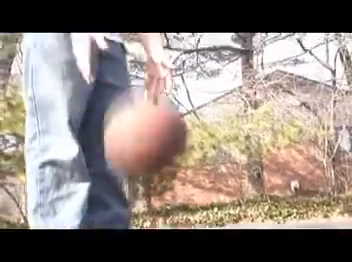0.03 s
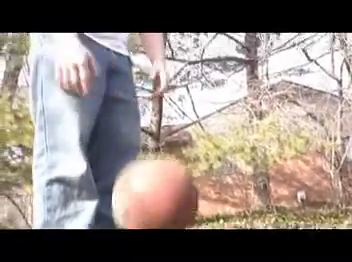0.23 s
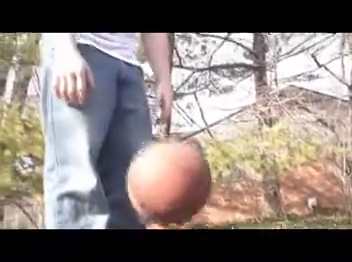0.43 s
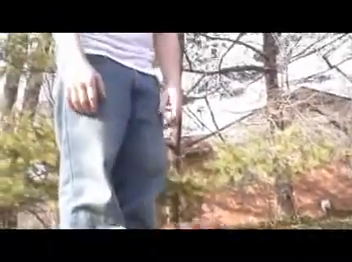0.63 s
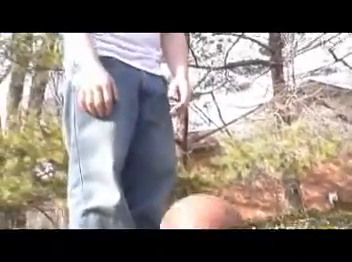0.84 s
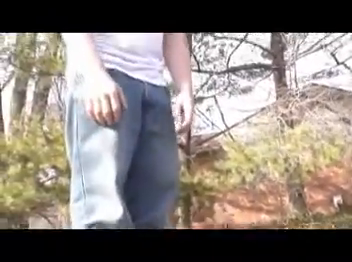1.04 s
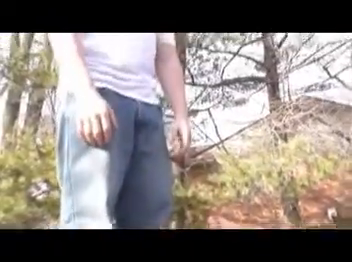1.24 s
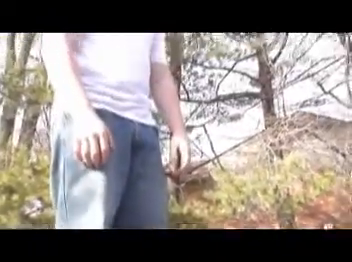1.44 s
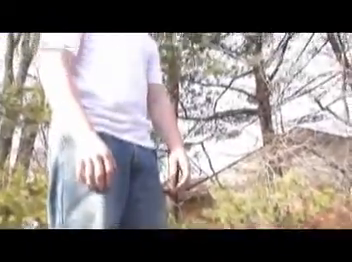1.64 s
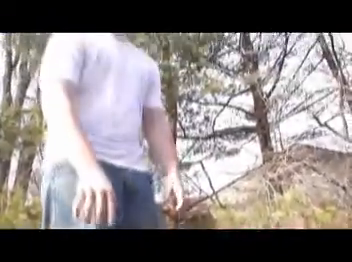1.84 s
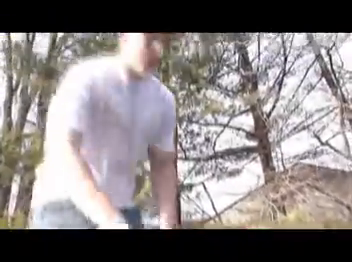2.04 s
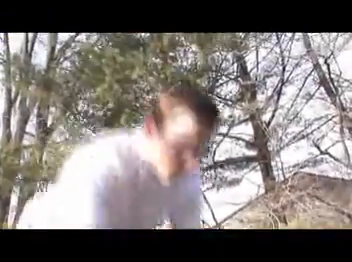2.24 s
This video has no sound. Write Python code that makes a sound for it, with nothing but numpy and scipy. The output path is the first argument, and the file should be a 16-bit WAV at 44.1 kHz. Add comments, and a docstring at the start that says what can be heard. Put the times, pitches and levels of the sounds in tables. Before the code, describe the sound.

A basketball bounces close by on pavement outdoors, each landing a rubbery slap and deep thump with a faint ping and thin echo. The loudest come at 0.2 and 0.7 seconds, then six more from 1.1 to 1.9 seconds, ever quicker and softer. Light ticks, faint clothes rustle and a distant engine hum sit underneath. Around 2 seconds, a brief puff of wind buffets the microphone.

```python
"""A paved drive among trees and houses, a stereo microphone close to a dropped basketball.
The ball bounces ever lower and faster: each bounce is a rubber slap, a deep thump of the shell and a
faint ping of the air inside. A nearby surface answers, and the yard adds a thin tail.
An engine hums far off, clothes rustle, hands and grit tick, and near the end a puff of wind
buffets the microphone."""
import sys
import numpy as np
from scipy import signal
from scipy.fft import rfft, irfft
from scipy.io import wavfile

SR = 44100
rng = np.random.default_rng(int(sys.argv[2]) if len(sys.argv) > 2 else 0)


def output_pcm(signal):
    """Save a mono or channel-first signal as 16-bit PCM at the path in sys.argv[1].

    Samples are clipped to [-1, 1] before scaling.
    """
    pcm = np.clip(np.atleast_2d(signal).T, -1, 1) * 32767
    wavfile.write(sys.argv[1], SR, np.round(pcm).astype(np.int16))


N = 105840


def amp(db):
    """Decibels to amplitude."""
    return 10 ** (np.asarray(db) / 20)


def unit(x):
    """Scales to an rms of one."""
    return x / np.sqrt(np.mean(x ** 2) + 1e-20)


def read(points, hz, column=1):
    """Reads one column of a table on a log-frequency axis."""
    table = np.transpose(points)
    return np.interp(np.log(hz + 1), np.log(table[0]), table[column])


def level(curve):
    """Gain over time from a dB curve."""
    return amp(np.interp(np.arange(N) / SR, *np.transpose(curve)))


def add(mix, start_s, sound):
    """Mixes a sound in at its start time."""
    part = mix[..., max(round(start_s * SR), 0):][..., :sound.shape[-1]]
    part += sound[..., :part.shape[-1]]


def colour(x, spectrum, tilt_db=0, tilt_from_hz=1500, size=4096):
    """Minimum-phase filter from a spectrum, with the treble tilted by tilt_db per octave."""
    hz = abs(np.fft.fftfreq(size, 1 / SR))
    octaves = np.log2(np.maximum(hz / tilt_from_hz, 1))
    log_gain = np.log(amp(read(spectrum, hz) + tilt_db * octaves))
    taps = np.fft.ifft(np.exp(np.conj(signal.hilbert(log_gain)))).real
    return signal.fftconvolve(x, taps[:size // 2])[:len(x)]


def fade(t, t60):
    """Exponential decay, 60 dB down at t60."""
    return np.exp(-np.log(1000) * t / t60)


def rise(t, rise_s):
    """Soft onset from zero towards one."""
    return 1 - np.exp(-t / rise_s)


def ring(t, hz, db, t60):
    """One dying mode."""
    return amp(db) * fade(t, t60) * np.sin(2 * np.pi * hz * t)


def burst(t, t60):
    """A dying puff of noise with an energy of one."""
    puff = rng.standard_normal(len(t)) * fade(t, t60)
    return puff / np.linalg.norm(puff)


def noise(spectrum, likeness):
    """Steady stereo noise with an rms of one, a given spectrum and left-right likeness (0 to 1)."""
    left, other = rfft(rng.standard_normal((2, N)))
    right = likeness * left + np.sqrt(1 - likeness ** 2) * other
    gain = amp(read(spectrum, np.fft.rfftfreq(N, 1 / SR)))
    return unit(irfft(np.array([left, right]) * gain, N))


# Open air all around the drive: freq_hz, gain_db
AIR_COLOUR = [(12, -40.5), (20, 4.5), (49, -15), (185, -10), (236, -16.5), (451, -18), (592, -20.5),
              (1850, -28.5), (2630, -37), (2850, -34.5), (4280, -38.5), (12000, -42), (13000, -50)]
# How alike air and rustle are on the microphone's two sides: freq_hz, likeness
STEREO_LIKENESS = [(30, 0.7), (150, 1), (600, 0), (2000, 0.11), (10000, 0.03)]
# Clothes, loudest at the start and the end: time_s, level_db
RUSTLE_LEVEL = [(0, -63), (.12, -111), (.3, -84), (1.5, -77), (1.9, -74), (2.15, -68), (2.4, -67)]
# Spectrum of the cloth: freq_hz, gain_db
RUSTLE_COLOUR = [(200, 9), (1200, 6.5), (3000, 2), (6000, -4), (12000, -6)]


def air_and_clothes(air_db=-63):
    """A steady outdoor hush with the rustle of clothes coming and going over it."""
    likeness = read(STEREO_LIKENESS, np.fft.rfftfreq(N, 1 / SR))
    air = amp(air_db) * noise(AIR_COLOUR, likeness)
    return air + level(RUSTLE_LEVEL) * noise(RUSTLE_COLOUR, likeness)


# Tones of an engine a long way off: pitch_hz, level_db
ENGINE_TONES = [(87, -66), (134, -70), (177.6, -65), (265, -76), (355, -84.5), (446.8, -79)]
# Their shared swell and fade: time_s, gain_db
ENGINE_SWELL = [(0, -2), (.9, 3.5), (1.5, -2), (2.4, -2.5)]


def far_engine(waver=0.013):
    """A distant engine hums, each tone wavering in pitch on its own."""
    t, hum = np.arange(N) / SR, np.zeros(N)
    for hz, db in ENGINE_TONES:
        drift = sum(np.sin(2 * np.pi * (rate * t + rng.random())) for rate in np.geomspace(.5, 7, 12))
        pitch_hz = hz * (1 + waver * unit(drift))
        hum += amp(db) * unit(np.sin(2 * np.pi * np.cumsum(pitch_hz) / SR))
    return level(ENGINE_SWELL) * hum


# Wind right on the microphone, peaking near two seconds: time_s, level_db
WIND_LEVEL = [(0, -67.5), (.5, -68.5), (1.75, -65), (1.87, -54), (1.945, -53), (1.98, -37.5), (2.02, -39.5),
              (2.065, -39.5), (2.09, -49), (2.2, -56.5), (2.4, -58.5)]
# Spectrum of its rumble: freq_hz, gain_db
WIND_COLOUR = [(15, -10.5), (32, 11.5), (58, -11), (95, 2.5), (190, -11.5), (300, -17.5), (500, -30),
               (1000, -49), (4000, -83)]
# Its two strongest buffets: start_s, level_db, pitch_hz, t60_s
WIND_BUFFETS = [(1.983, -24.5, 162, 0.054), (2.047, -23, 94, 0.059)]


def wind():
    """Low turbulence at the microphone with two soft buffets."""
    t = np.arange(SR // 4) / SR
    rumble = level(WIND_LEVEL) * noise(WIND_COLOUR, likeness=0.71)
    for start_s, db, hz, t60 in WIND_BUFFETS:
        add(rumble, start_s, rise(t, rise_s=.012) * ring(t, hz, db, t60))
    return rumble


# Hands, clothes and grit: start_s, level_db, tilt_db_per_octave, t60_s
TICKS = [(0.037, -27, -2, 0.1), (.062, -28.5, -0.5, 0.2), (0.502, -31.5, -19, 0.017),
         (0.5832, -26, -22.5, 0.083), (0.6631, -27.5, 0.5, 0.022), (.675, -31.5, -2, 0.0071),
         (0.7776, -40.5, 3, 0.013), (1.9159, -35, 3.5, 0.0041), (1.9927, -26.5, -3, 0.024),
         (2.1078, -35.5, -1.5, 0.019)]
# Spectrum of a tick before its tilt: freq_hz, gain_db
TICK_COLOUR = [(100, -28), (600, -2.5), (2000, -2.5), (4500, -4.5), (8000, -13.5), (13000, -15)]
# A soft hollow knock just after the second bounce: start_s, level_db
KNOCKS = [(0.7779, -47)]
# Modes of that knock: pitch_hz, gain_db, t60_s
KNOCK_MODES = [(392, -12, 0.13), (423, 4, 0.081), (662, -0.5, 0.041), (900, -7, 0.046)]


def ticks_and_knock():
    """Light touches give short puffs of noise and one knock rings briefly, all in the centre."""
    t, touches = np.arange(SR // 4) / SR, np.zeros(N)
    for start_s, db, tilt_db, t60 in TICKS:
        add(touches, start_s, amp(db) * colour(burst(t, t60), TICK_COLOUR, tilt_db))
    for start_s, db in KNOCKS:
        add(touches, start_s, amp(db) * sum(ring(t, *mode) for mode in KNOCK_MODES))
    return touches


# Reverberation of the yard around the drive: freq_hz, gain_db, t60_s
YARD_TAIL = [(90, -53, 0.56), (170, -13, 0.88), (280, -19.5, 0.62), (500, -17.5, 0.34), (990, -22, 0.6),
             (2800, -26, 0.7), (4100, -24, 0.76), (6000, -27, 0.45), (12000, -59, 0.14)]


def yard_tail(x):
    """Trees and houses scatter a thin diffuse tail, different on each side of the microphone."""
    hz, t, bands = signal.stft(rng.standard_normal((2, SR)), SR, nperseg=512)
    t60 = read(YARD_TAIL, hz, column=2)[:, None]
    decay = fade(t, t60) * np.sqrt(2 * np.log(1000) / (t60 * SR))  # equal energy for any t60
    gain = amp(read(YARD_TAIL, hz))[:, None]
    tail = signal.istft(bands * gain * decay, SR)[1]
    return signal.fftconvolve(x[None], tail, axes=1)[:, :N]


# What a surface near the ball sends back: freq_hz, gain_db
ECHO_COLOUR = [(100, -19), (250, -4), (480, 4), (900, -2), (1450, -2.5), (2500, -16.5), (5000, -14),
               (12000, -6.5)]


def near_echo(x, delay_s=.0131, gain_db=-12, scatter_db=-5):
    """One dull reflection from nearby, scattered differently from each spot where the ball lands."""
    t, echo = np.arange(SR // 10) / SR, np.zeros(len(x))
    path = amp(scatter_db) * burst(t, t60=0.017)
    path[0] += 1  # the clean reflection
    add(echo, delay_s, amp(gain_db) * signal.fftconvolve(x, colour(path, ECHO_COLOUR)))
    return echo


# Rubber slapping the paving, heard close: freq_hz, gain_db
SLAP_COLOUR = [(40, -7.5), (150, -16), (350, 1), (700, 3.5), (1400, 5), (2300, 0.5), (3600, -5),
               (5000, -13), (8000, -18.5), (13000, -19.5)]
# The scattered slap in the microphone's side signal: freq_hz, gain_db
SLAP_SIDE_COLOUR = [(100, 15), (500, 2), (1400, 1), (3600, -7.5), (5000, -13), (8000, -19), (13000, -28)]
# Modes of the ball's shell: pitch_hz, gain_db, t60_s
SHELL_MODES = [(177, -20.5, 0.031), (236, -1, 0.029), (565, -18, 0.11), (728, -6.5, 0.015),
               (974, -23.5, 0.054)]
# Modes of the air inside the ball: pitch_hz, gain_db, t60_s
CAVITY_MODES = [(969, -3, .35), (1572, -1, .35), (2110, 4, .45), (2638, -5, .5), (2778, -5, 1.0),
                (3160, 2, .4), (3405, -8, .7), (3601, -11, .55), (3671, 1, .38), (4005, -6, .45),
                (4172, -10, .4), (5782, -16, .5)]
THUMP_HZ, THUMP_T60_S, CLAP_T60_S = 104, .082, 0.02
SCATTER_MID_DB, SCATTER_SIDE_DB, SCATTER_T60_S = 1, -4, .019
ECHO_GROWTH = 0.1494  # dB of echo gained per dB that the slap is weaker, as the ball moves away


def bounce(thump_db, push_db, shell_db, hollow_db, hollow_hz, slap_db, body_db, bite_db, fizz_db,
           low_clap_hz, low_clap_db, high_clap_hz, high_clap_db, ping_db):
    """Rubber slaps the ground and claps out trapped air; the shell thumps and the air inside pings."""
    t = np.arange(SR) / SR
    slap_tone = [(515, body_db), (1520, 0), (3150, bite_db), (9200, fizz_db)]  # freq_hz, gain_db
    contact = amp(SCATTER_MID_DB) * burst(t, SCATTER_T60_S)
    contact[0] -= 1  # the sharp first impact
    slap = amp(slap_db) * colour(colour(contact, SLAP_COLOUR), slap_tone)
    clap = ring(t, low_clap_hz, low_clap_db, CLAP_T60_S)
    clap += ring(t, high_clap_hz, high_clap_db, CLAP_T60_S)
    onset = rise(t, rise_s=.0015)
    pulse = onset * fade(t, THUMP_T60_S) * np.cos(2 * np.pi * THUMP_HZ * t)
    after_ring = rise(t, rise_s=.05) * ring(t, hz=129, db=-22, t60=.3)
    thump = amp(thump_db) * (pulse + after_ring)
    shell = onset * sum(ring(t, hz, db + shell_db, t60) for hz, db, t60 in SHELL_MODES)
    hollow = ring(t, hollow_hz, hollow_db, t60=0.083)
    ping = sum(ring(t, hz, db + ping_db + rng.standard_normal(), t60) for hz, db, t60 in CAVITY_MODES)
    mid = slap - clap + thump + shell + hollow + ping
    # The push of air and the scattered slap reach the two microphone ports unequally.
    push = onset * ring(t, hz=107, db=push_db, t60=0.025)
    scatter = colour(colour(burst(t, SCATTER_T60_S), SLAP_SIDE_COLOUR), slap_tone)
    side = push + amp(slap_db + SCATTER_SIDE_DB) * scatter
    return np.array([mid + side, mid - side]) + amp(-ECHO_GROWTH * slap_db) * near_echo(mid)


# Eight landings close to the microphone: start_s, thump_db, push_db, shell_db, hollow_db, hollow_hz,
# slap_db, body_db, bite_db, fizz_db, low_clap_hz, low_clap_db, high_clap_hz, high_clap_db, ping_db
BOUNCES = [(0.2448, -11, -13, -45, -37, 443, 0, 3.5, 2, -1, 1380, -27.5, 2900, -45, -65),
           (.7290, -16, -15.5, -20.5, -33.5, 492, -2.5, -11, 1.5, -7.5, 1048, -28.5, 2163, -26.5, -70.5),
           (1.0810, -23, -29, -32, -47, 515, -9, 1.5, -1, -1.5, 1310, -44.5, 1550, -35, -75.5),
           (1.3383, -31.5, -47, -28, -68, 450, -16, 5.5, -4, 1.5, 1700, -41, 1966, -40, -83),
           (1.5366, -36.5, -54, -37, -51, 472, -20, 3, -1.5, -2, 790, -47, 1600, -42, -83.5),
           (1.6922, -38.5, -56, -67, -52.5, 459, -24, 2.5, 2.5, -3, 1480, -47.5, 1553, -41.5, -85),
           (1.8144, -44, -46, -50.5, -50.5, 435, -34, 10, 5.5, 0, 1644, -49.5, 1860, -53, -89),
           (1.9126, -41.5, -34, -65, -70, 620, -32.5, 2, -1.5, -1, 705, -50.5, 1350, -60.5, -99)]


def basketball():
    """The dropped ball bounces ever lower, so the landings come quicker and softer."""
    ball = np.zeros((2, N))
    for start_s, *landing in BOUNCES:
        add(ball, start_s, bounce(*landing))
    return ball


def scene():
    """The ball and its reflections over the outdoor background."""
    ball = basketball()
    return air_and_clothes() + yard_tail(ball.mean(0)) + ticks_and_knock() + far_engine() + wind() + ball


def record(dry, cutoff_hz=13200):
    """The microphone's band limit takes off the highest treble."""
    lowpass = signal.firwin(401, cutoff_hz, window=("kaiser", 8), fs=SR)
    return signal.oaconvolve(dry, lowpass[None], "same")


dry = scene()
out = record(dry)
output_pcm(out)
```